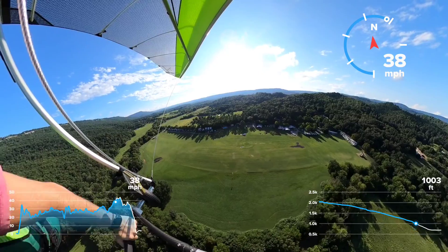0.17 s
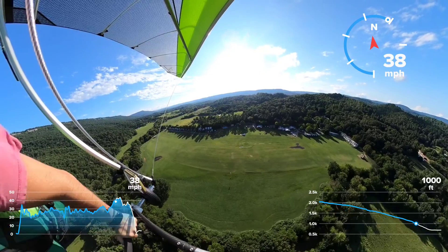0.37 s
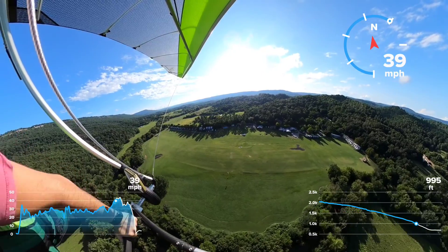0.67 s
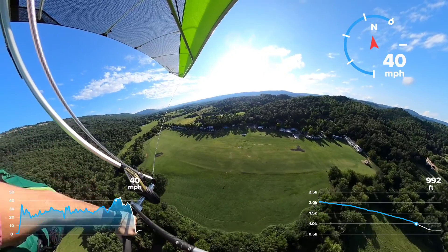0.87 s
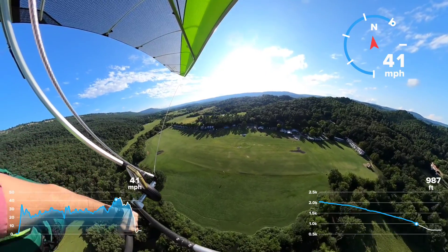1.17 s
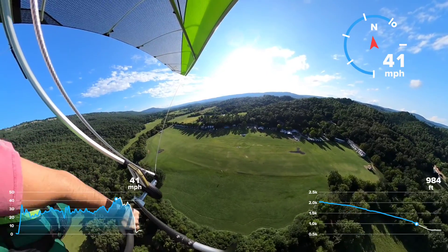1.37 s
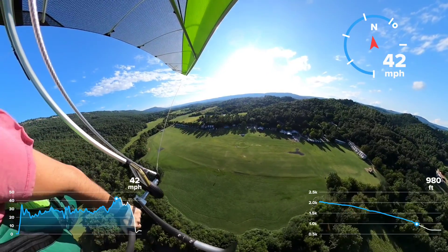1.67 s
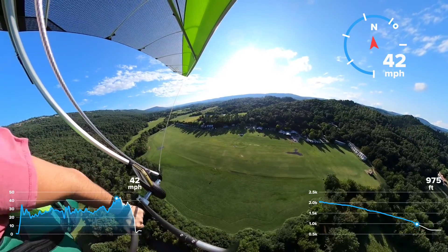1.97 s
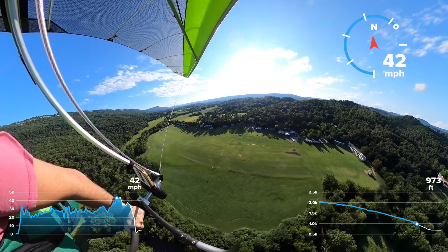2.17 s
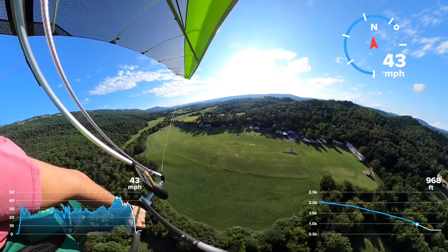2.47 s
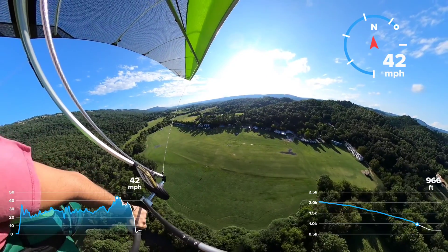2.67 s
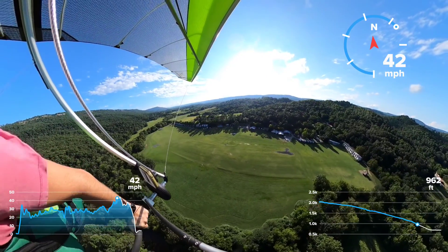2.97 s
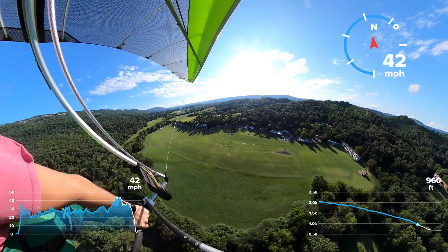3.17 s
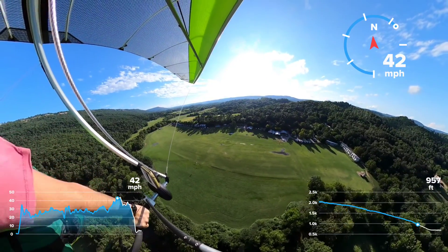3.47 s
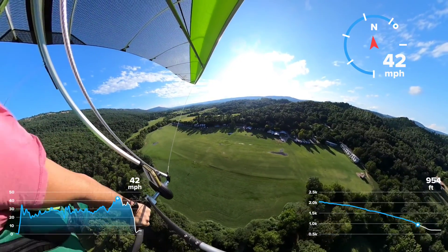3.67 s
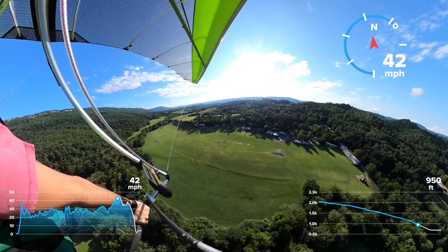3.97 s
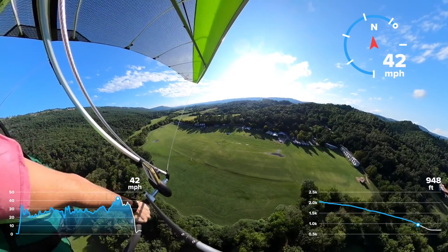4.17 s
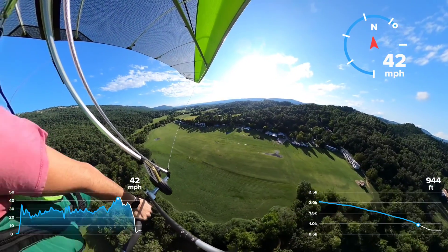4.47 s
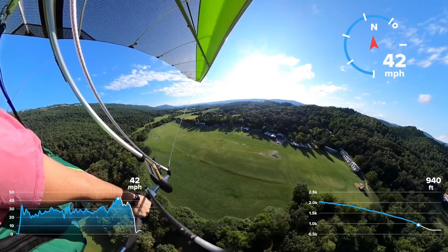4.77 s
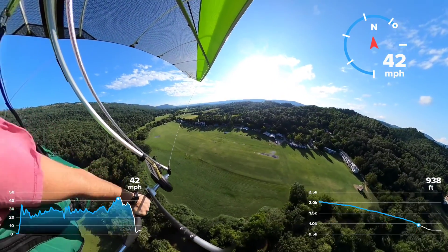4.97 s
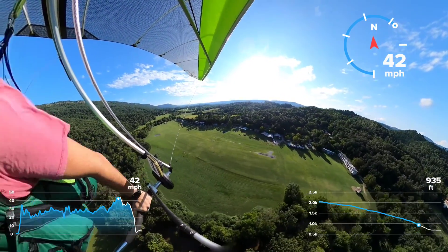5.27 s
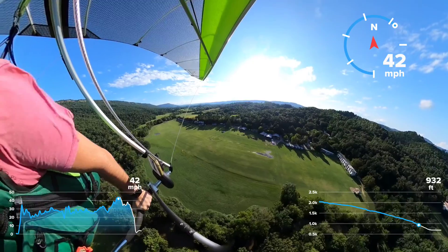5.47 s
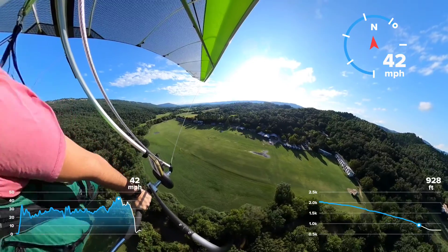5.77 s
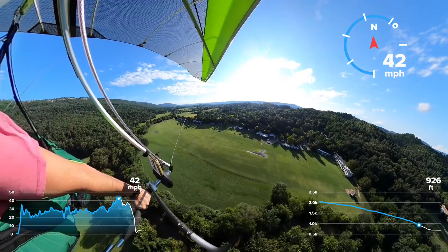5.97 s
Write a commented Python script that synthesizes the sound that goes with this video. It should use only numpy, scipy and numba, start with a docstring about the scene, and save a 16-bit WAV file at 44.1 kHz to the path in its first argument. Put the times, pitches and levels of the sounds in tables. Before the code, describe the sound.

Close, continuous wind roar on a small camera microphone mounted on a hang glider in open sky. Deep uneven buffeting dominates, over a softer rush and faint hiss. Wires and tubes whistle weakly and breathily, wavering in pitch. The low roar thickens by two seconds, brief wire notes flicker around three seconds, and a hard thump of air lands near the end. No echo.

```python
"""Wind over a small camera on a hang glider in steady flight, open sky, no echoes.
From the start, filtered noises make the wind: big eddies buffet the port, smaller ones roar, rush and hiss.
Narrow noise bands whistle beside them as wires and tubes shed vortices; short spits of air join from 0.3 s.
The low roar grows by 2 s, the middle wire sings out in short notes near 2.6-3.1 s and again near 5.2 s,
and a hard buffet comes at 5.7 s. The thinnest wire and the tubes whistle higher as the air speeds up."""
import sys
import numpy as np
from scipy import signal
from scipy.fft import rfft, irfft, next_fast_len
from scipy.io import wavfile
from scipy.ndimage import uniform_filter1d
from numba import njit

SR = 44100
rng = np.random.default_rng(int(sys.argv[2]) if len(sys.argv) > 2 else 0)


def waveform_to_disk(signal):
    """Save audio, clipped to [-1, 1], as 16-bit WAV at the path in sys.argv[1]."""
    frames = np.transpose(np.atleast_2d(signal))
    scaled = np.clip(frames, -1, 1) * 32767
    samples = np.round(scaled).astype(np.int16)
    wavfile.write(sys.argv[1], SR, samples)


N = 269451  # length [samples]
T = np.arange(N) / SR  # time [s]


def undb(db):
    """Turn decibels into a gain."""
    return 10 ** (np.asarray(db) / 20)


def unit(x):
    """Scale a signal to an rms (average strength) of 1."""
    return x / np.sqrt(np.mean(x ** 2))


def columns(table):
    """Draw straight lines between the rows of a table: one curve per column after the time."""
    times_s, *values = np.transpose(table)
    return [np.interp(T, times_s, column) for column in values]


def swells(table):
    """Raise or lower levels [dB] by a smooth bell per row; the bells of each column add up."""
    total_db = 0
    for middle_s, length_s, *db in table:
        bell = np.exp(-(2 * (T - middle_s) / length_s) ** 2)
        total_db = total_db + np.outer(db, bell)
    return total_db


def walk(rate):
    """Wander at random: draw `rate` values per second, hold each, then smooth twice; rms 1."""
    hold = int(SR / rate)
    steps = np.repeat(rng.standard_normal(N // hold + 1), hold)
    smooth = uniform_filter1d(uniform_filter1d(steps, hold), hold)
    return unit(smooth[:N])


def evened(x, share, span_s):
    """Divide a sound by part of its own swell, so that its strength varies less."""
    span = int(span_s * SR)
    power = unit(x) ** 2
    for _ in range(3):
        power = uniform_filter1d(power, span)
    swell = power + .01  # keeps the division safe in quiet gaps
    return x / swell ** (np.clip(share, 0, 1) / 2)


@njit
def svf(x, hz, width):
    """Let through a band of `width` Hz around a moving centre (a state-variable filter)."""
    y, band, low = np.empty(len(x)), 0., 0.
    for i in range(len(x)):
        g, damping = np.tan(np.pi * hz[i] / SR), width / hz[i]
        v = (band + g * (x[i] - low)) / (1 + g * (g + damping))
        band, low, y[i] = 2 * v - band, low + 2 * g * v, damping * v
    return y


def turbulence(levels_db, blend_octaves=.8, even_s=0.065):
    """Split the wind's colour among unrelated noises, one per eddy size, each with its own flicker."""
    # colour of the turbulence at the port: (frequency [Hz], relative level per Hz [dB])
    wind_colour = [(10, -4), (18, -9), (37, 2), (72, -2.5), (146, -6), (200, -11.5), (256, -14.5),
                   (320, -18), (400, -23), (500, -25), (760, -29.5), (1050, -34.5), (1400, -39),
                   (2100, -45), (3500, -48.5), (4600, -55), (7900, -67), (9000, -75.5), (11500, -82)]
    # borders between neighbouring eddy sizes: (frequency [Hz])
    layer_edges_hz = [42, 90, 220, 400, 750, 2050, 5200]
    # heave, buffet, rumble, low roar, high roar, mid rush, rush, hiss:
    # (flicker [dB rms], flicker rate [per s], evenness of strength [0-1])
    eddy_layers = [(0, 20, 0.97), (0.23, 42, 0.95), (1, 45, 0.95), (1.64, 60, 0.6), (2.13, 70, 0.6),
                   (0.98, 40, 0), (1, 90, 0.2), (0, 40, .1)]
    size = next_fast_len(N)
    octave = np.log2(np.maximum(np.arange(size // 2 + 1) * SR / size, 1))
    hz, db = np.transpose(wind_colour)
    colour = undb(np.interp(octave, np.log2(hz), db, left=-60))
    # the share of power below each edge fades from 1 to 0 across the edge
    below = [np.clip(.5 - (octave - np.log2(edge)) / blend_octaves, 0, 1) for edge in layer_edges_hz]
    shares = np.diff([0 * octave, *below, 1 + 0 * octave], axis=0)
    out = 0
    for share, level_db, (flicker_db, rate, even) in zip(shares, levels_db, eddy_layers):
        spectrum = rfft(rng.standard_normal(size)) * colour * np.sqrt(np.maximum(share, 0))
        eddies = irfft(spectrum, size)[:N]
        flickering = evened(eddies, even, even_s) * undb(flicker_db * walk(rate))
        out = out + unit(flickering) * undb(level_db)
    return out


def wires(pitches_hz, levels_db, waver=0.0027, flutter_rate=35, lock_in=.8):
    """Whistle as air sheds vortices: narrow noise bands whose pitch wavers and strength flutters."""
    # thick wire, middle wire, thinnest wire, its breathy fringe, two tubes:
    # (width of the narrower filter [Hz], flutter [dB rms])
    whistle_bands = [(28.4, 1.5), (112, 1.5), (145, 1.3), (523, 0.5), (60, 1.3), (71.6, 0.7)]
    out = 0
    for (width_hz, flutter_db), hz, level_db in zip(whistle_bands, pitches_hz, levels_db):
        centre_hz = hz * (1 + waver * walk(13.0))
        narrow = svf(rng.standard_normal(N), centre_hz, 1. * width_hz)
        shed = svf(narrow, centre_hz, 3.9 * width_hz)
        # shedding locks to the wire's own motion and keeps a steadier strength
        steady = evened(shed, lock_in, 0.026)
        out = out + unit(steady * undb(flutter_db * walk(flutter_rate))) * undb(level_db)
    return out


def spits(width_hz=1500.0, rise_s=0.0048, fade_s=0.0096, sink_per_s=8):
    """Puff air briefly across the port: noise with a quick rise, a short fade and a sinking colour."""
    # (start [s], level before the rise and fade reduce it [dB], starting frequency [Hz])
    spit_times = [(0.3094, -53, 2810), (1.0597, -51, 3200), (1.411, -55, 3440), (1.689, -51, 3370),
                  (1.9394, -52, 3500), (2.239, -49, 3720), (2.6, -52, 3000), (2.6494, -48, 2770),
                  (2.685, -51, 3200), (3.39, -51, 2800), (4.3124, -57, 2600), (4.455, -55.5, 2980),
                  (4.696, -52.5, 3840), (4.7185, -49, 2300), (4.87, -50, 2780), (5.145, -49, 2900),
                  (5.2315, -52, 3000), (5.264, -51, 2760), (5.6381, -52, 3030)]
    shape, centre_hz = 0, np.full(N, 3e3)
    for start_s, db, hz in spit_times:
        age = np.maximum(T - start_s, 0)
        shape = shape + undb(db) * (1 - np.exp(-age / rise_s)) * np.exp(-age / fade_s)
        sinking_hz = hz / (1 + sink_per_s * np.minimum(age, .05))
        centre_hz = np.where(age > 0, sinking_hz, centre_hz)
    noise = svf(rng.standard_normal(N), centre_hz, width_hz)
    return shape * unit(svf(noise, centre_hz, width_hz))


def scene():
    """Mix wind and whistling rigging; air speed, gusts and small puffs set their levels."""
    # gusts and lulls: (middle [s], length [s], buffet [dB], rumble [dB], roar [dB], rush [dB])
    gust_bells = [(.06, 0.18, 2, 3, 1, -3), (.25, 0.096, 2, -6, -0.5, -1), (.31, 0.096, 1, 4, 0.5, 0.5),
                  (.43, 0.085, -2, 0, -4, -2.5), (.49, 0.036, 7, -1, 2.5, 1),
                  (.65, 0.38, -4, -2, -1.5, -1.5), (.79, 0.037, 1, 4.5, 8.5, 0),
                  (.93, .07, -5, -1.5, 2.5, 0.5), (1.02, 0.099, 5.5, 2, 3, 1),
                  (1.19, 0.12, 0, -4, -0.5, -1.5), (1.3, 0.059, -2, 2, 5, -1), (1.43, 0.15, 3.5, 3, 3.5, 1),
                  (1.56, 0.062, -3, -2.5, 3, -0.5), (1.66, 0.2, -1.5, -5, 3.5, 0),
                  (1.85, 0.05, 5.5, -1, 2.5, 2), (1.96, 0.26, 1, 1.5, 2, 2.5),
                  (2.1, 0.078, 0, -3.5, -2.5, -2), (2.28, 0.063, 3, -1.5, 2.5, 1.5),
                  (2.38, 0.058, 2, 1, -1.5, 0.5), (2.45, 0.15, -2, 4, 3.5, 1), (2.6, 0.1, 5, 2.5, 4, 2),
                  (2.83, 0.071, -2, 1.5, 4.5, 0.5), (3.02, 0.057, -5, -2.5, -2, -0.5),
                  (3.2, 0.11, 0, 1, -2.5, 0), (3.46, 0.055, -3.5, 0, 3, -2.5),
                  (3.62, 0.067, 4.5, 4.5, -7.5, 0), (3.8, 0.064, 3, 5.5, -2, 1.5),
                  (3.9, 0.11, 0, 3.5, 1.5, 1), (4.05, 0.25, -2.5, 0, -5.5, -0.5),
                  (4.31, 0.12, 0.5, 4, -3.5, 2), (4.48, 0.07, -1, 5.5, -6.5, 1),
                  (4.57, 0.092, 1, -4, -2.5, -0.5), (4.65, 0.054, -1, 2.5, 1.5, 0.5),
                  (4.75, 0.1, 3, 2, 2, 0.5), (4.84, 0.077, -4.5, 4, -3, -0.5), (4.92, 0.086, 0, -9, -4, -2),
                  (5.03, 0.11, -1, 2, 0, -3), (5.13, 0.047, 4, -1, 0.5, -1), (5.27, 0.11, 2, 7.5, 5, 4),
                  (5.45, 0.15, -7, 1, -1.5, -1.5), (5.58, 0.21, -2, -0.5, -2, 0),
                  (5.7, 0.055, 8, 6, 1.5, 3), (6.1, 0.25, -3.5, -3, -6, -0.5)]
    # a wire sings out or falls quiet: (middle [s], length [s], thick wire [dB], middle wire [dB])
    singing = [(.27, 0.19, -2, 9), (.5, 0.16, 4, 6.5), (.75, 0.2, -9, 6.5), (.97, .06, 1, 4),
               (1.1, 0.09, 6, 8), (1.4, 0.15, 5.5, 6), (1.75, 0.38, 0.5, -9), (1.93, 0.13, 3.5, 4),
               (2.2, 0.34, 4, 3), (2.4, 0.1, -10, -5), (2.645, 0.04, -3, 11), (2.695, 0.038, -2, 10),
               (2.905, 0.025, 5, 11), (3.03, 0.023, -2, 13), (3.075, 0.025, -5, 11.5), (3.13, .025, 1, 8),
               (3.18, 0.12, 8.5, 3), (3.3, .12, -1, 4.5), (3.5, 0.18, 0.5, -5), (4.03, 0.079, -2.5, -10),
               (4.13, 0.11, 7, 5), (4.35, 0.056, 6, 8), (4.48, 0.056, 7, 6), (4.78, 0.15, 3.5, -12),
               (5.233, .02, 0, 13), (5.272, 0.04, 8, 8.5), (5.75, 0.23, -1, 8.5), (5.96, 0.12, 1, 7)]
    # the thinnest wire, whose pitch tells the air speed: (time [s], pitch [Hz], level [dB])
    thin_wire = [(0, 5127, -72.5), (.55, 5123, -75), (.9, 5220, -75), (1.3, 5265, -69), (1.6, 5243, -71.5),
                 (2.0, 5226, -72), (2.6, 5274, -71.5), (3.1, 5282, -70.5), (3.45, 5265, -70.5),
                 (3.8, 5250, -70.5), (4.2, 5220, -69.5), (4.65, 5246, -72), (5.0, 5263, -70),
                 (5.35, 5220, -72), (5.65, 5200, -71.5), (6.11, 5176, -71.5)]
    # the two heavier wires, each in its own patch of air:
    # (time [s], thick wire pitch [Hz], middle wire pitch [Hz])
    heavy_pitch = [(0, 756, 1760), (.5, 781, 1752), (.95, 827, 1802), (1.15, 832, 1806), (1.42, 820, 1872),
                   (1.9, 866, 1900), (2.3, 840, 1835), (2.68, 862, 1876), (2.92, 846, 1840),
                   (3.2, 868, 1790), (3.7, 848, 1847), (4.12, 825, 1790), (4.45, 860, 1800),
                   (4.8, 847, 1850), (5.25, 858, 1830), (5.7, 842, 1810), (6.11, 836, 1800)]
    # buffet, rumble, mid rush, rush, thick wire, middle wire:
    # (level at cruise [dB], change per % of extra air speed [dB])
    with_speed = [(-24, -0.5), (-27, 0.5), (-45, 1.7), (-59, 0.64), (-49.5, 1.5), (-58.5, 2)]
    # slow drift: (time [s], low roar level [dB], high roar level [dB], hiss level [dB])
    slow_drift = [(0, -36.5, -46.5, -67.5), (.55, -39.5, -44.5, -67.5), (1.0, -36.5, -42.5, -67.5),
                  (1.6, -36.5, -42, -68.5), (2.0, -32.5, -39, -69.5), (2.4, -33.5, -36.5, -69),
                  (2.9, -36, -39.5, -69), (3.45, -31.5, -39.5, -68), (4.1, -32, -39.5, -69),
                  (4.8, -32.5, -38, -69.5), (5.6, -33, -39, -70.5), (6.11, -32, -38.5, -69.5)]
    # the two tubes: (level [dB])
    tubes_db = [-57, -54.5]
    cruise_hz = 5250  # pitch of the thinnest wire at cruise

    thin_hz, thin_db = columns(thin_wire)
    speed = thin_hz / cruise_hz
    faster = 100 * (speed - 1)  # air speed above cruise [%]
    speed_levels = [db + slope_db * faster for db, slope_db in with_speed]
    buffet_db, rumble_db, mid_db, rush_db, *sung_db = speed_levels
    low_db, high_db, hiss_db = columns(slow_drift)

    buffet, *gust = swells(gust_bells)
    # small puffs, 16 random values per s, move roar and rush one way and rumble the other [dB rms]
    rumble, roar, rush = gust + np.outer([-0.53, 0.6, 0.33], walk(16))
    # buffet, rumble and low roar break up together into blows and gaps, 30 values per s [dB rms]
    broken = np.outer([1.15, 1.22, 1.07], walk(30))
    # the factors are the share of a neighbour's gust that each layer feels
    wind = turbulence([
        buffet_db - 2.5 + 0.53 * buffet,  # heave, the slowest eddies
        buffet_db + buffet + broken[0],
        rumble_db + rumble + broken[1],
        low_db + roar + broken[2],
        high_db + 0.6 * roar,
        mid_db + 0.97 * rush,
        rush_db + rush,
        hiss_db])
    wind = wind + spits()

    # the tubes' pitch follows the thinnest wire's, exaggerated by the power 1.8
    tubes_hz = np.outer([1188, 964], speed ** 1.8)
    fringe_hz, fringe_db = 0.98 * thin_hz, thin_db + 1.5
    rigging = wires([*columns(heavy_pitch), thin_hz, fringe_hz, *tubes_hz],
                    [*(sung_db + swells(singing)), thin_db, fringe_db, *tubes_db])
    return (wind + rigging)[None]


def record(dry):
    """Take out part of the swell as the camera's gain control does, round peaks and cut the top."""
    round_at = 0.54  # ceiling that the peaks bend towards
    top_hz = 11900
    ridden = evened(dry, share=0.17, span_s=0.041)
    rounded = round_at * np.tanh(ridden / round_at)
    top_cut = signal.ellip(8, .2, 60, top_hz, fs=SR, output="sos")
    return signal.sosfilt(top_cut, rounded)


dry = scene()
out = record(dry)
waveform_to_disk(out)
```